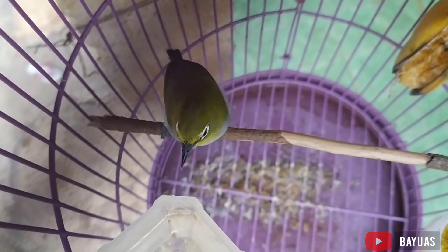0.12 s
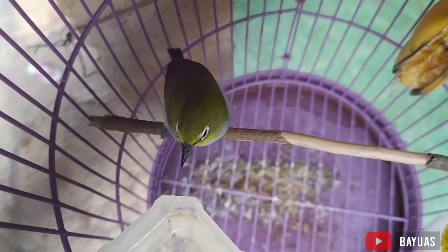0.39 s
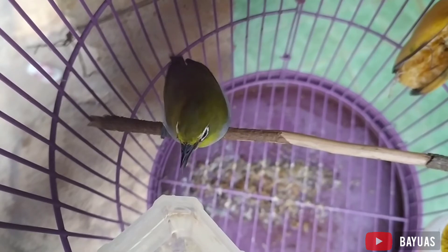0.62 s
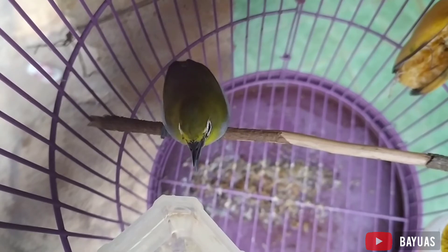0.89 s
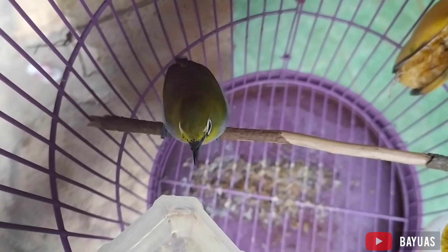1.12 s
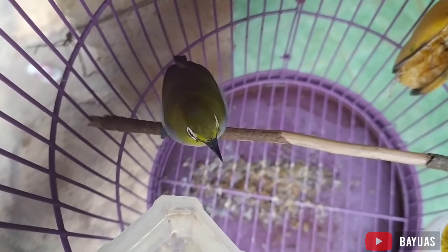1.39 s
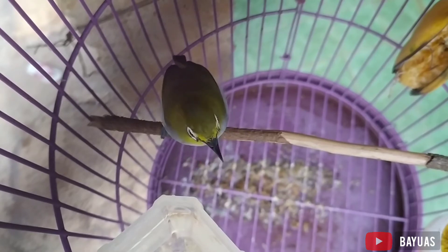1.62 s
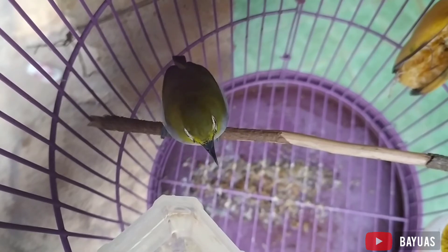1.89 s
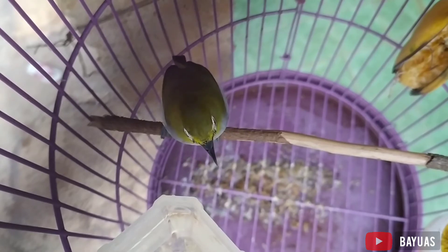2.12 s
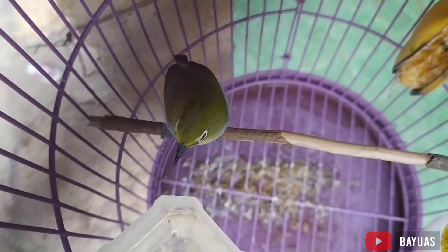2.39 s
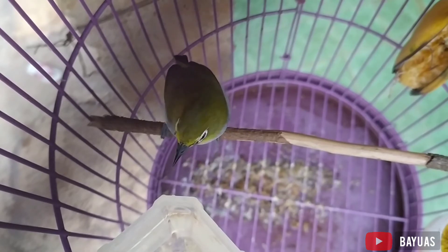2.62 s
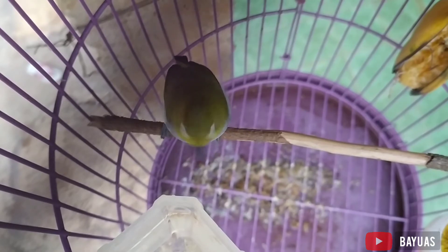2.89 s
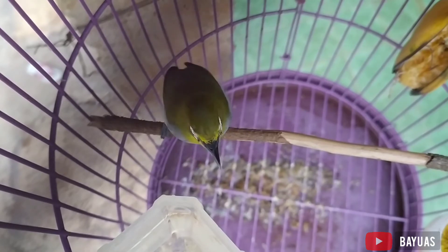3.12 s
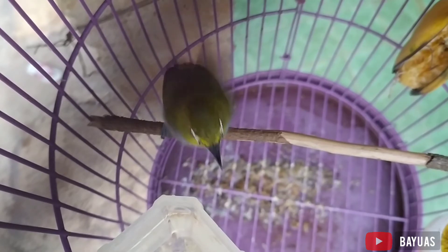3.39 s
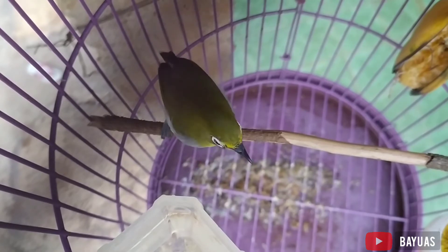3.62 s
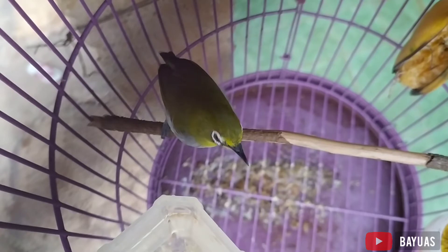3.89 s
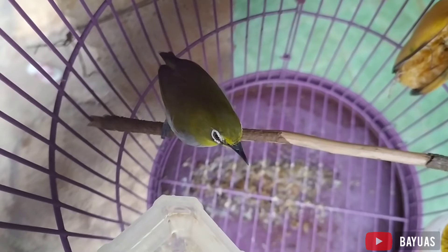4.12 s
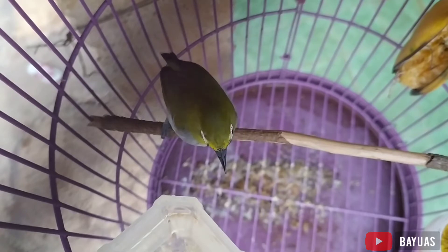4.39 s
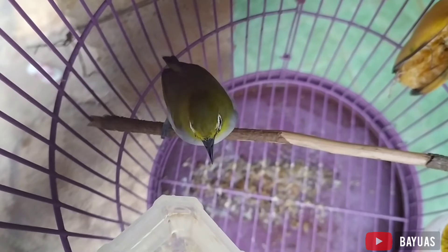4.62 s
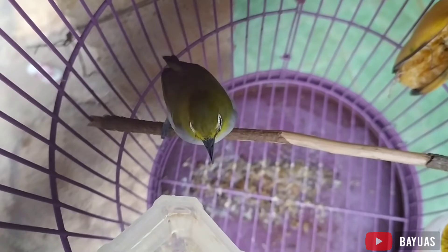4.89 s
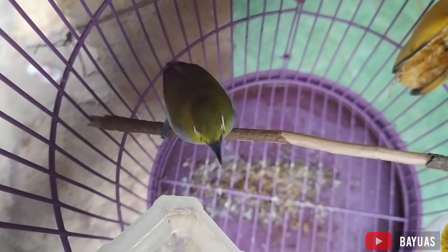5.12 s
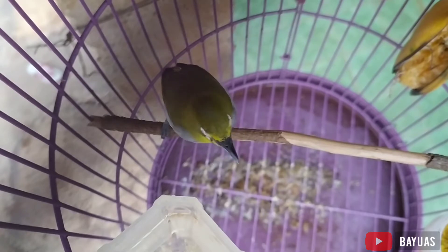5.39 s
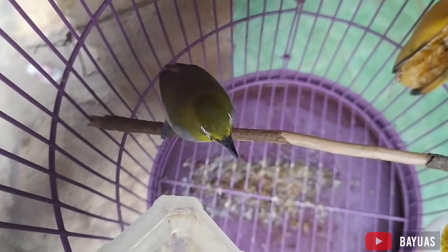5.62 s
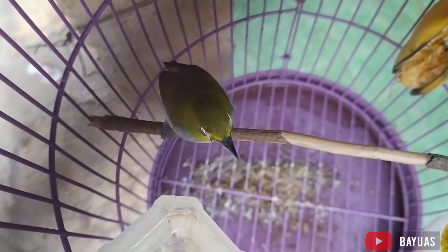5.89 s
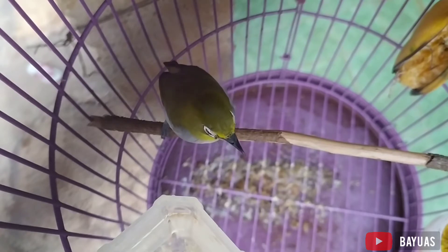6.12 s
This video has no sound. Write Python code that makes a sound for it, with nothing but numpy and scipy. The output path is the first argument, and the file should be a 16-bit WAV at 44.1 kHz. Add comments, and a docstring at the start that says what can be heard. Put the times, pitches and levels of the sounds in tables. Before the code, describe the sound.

A small caged bird gives three loud, buzzy high trills close by, while far birds whistle thinly and a small engine putters past in the street.

```python
"""Yard hiss, a single-cylinder engine and far bird whistles run throughout; over them a small caged bird
gives three trills of quick upward chirps close to a pair of microphones.
Chirps are gliding partials coloured by near reflections; whistles are curved sine glides; the engine
is a stack of firing harmonics that speeds up in the street, with clatter; the hiss is shaped noise.
A soft knock and a faint far horn are sine tones; sparse random echoes make the yard."""
import sys
import numpy as np
from scipy import signal
from scipy.io import wavfile
from scipy.ndimage import uniform_filter1d

SR = 44100
rng = np.random.default_rng(int(sys.argv[2]) if len(sys.argv) > 2 else 0)


def linear_from_db(decibels):
    """Turn decibels (scalar or array-like) into linear amplitude factors; 0 gives 1."""
    return 10 ** (np.asarray(decibels, float) / 20)


def master_out(mix):
    """Clip the mix to full scale and print it as 16-bit PCM to the path in sys.argv[1]."""
    frames = np.transpose(np.atleast_2d(mix))
    ceiling = np.clip(frames, -1, 1)
    pcm = np.round(ceiling * 32767).astype(np.int16)
    wavfile.write(sys.argv[1], SR, pcm)


N = 276234  # length in samples


def evened(x):
    """Scales to rms 1."""
    return x / np.sqrt(np.mean(x ** 2) + 1e-20)


def read(points, hz):
    """Reads a table on a log-frequency axis."""
    f, value = np.transpose(points)
    return np.interp(np.log(hz + 1), np.log(f + 1), value)


def add(mix, s, sound):
    """Mixes a sound in at s seconds."""
    part = mix[..., round(s * SR):][..., :sound.shape[-1]]
    part += sound[..., :part.shape[-1]]


def wobble(count, smooth_s):
    """Random wander of rms 1: white noise smoothed twice over smooth_s."""
    size = max(int(smooth_s * SR), 1)
    once = uniform_filter1d(rng.standard_normal(count), size)
    return evened(uniform_filter1d(once, size))


def band(x, low_hz, high_hz):
    """Band-pass, rms 1."""
    sos = signal.butter(7, [low_hz, high_hz], "band", fs=SR, output="sos")
    return evened(signal.sosfilt(sos, x))


def hiss():
    """Faint hiss of the yard: random short-time spectra with faint drifting patches."""
    # colour of the hiss: f/Hz, relative level/dB per Hz
    colour = [(20, -9), (36, -14), (55, -9), (130, -12), (260, -17), (485, -21.5), (1570, -26.5),
              (3000, -30.5), (3700, -34), (5600, -34.5), (6720, -30.5), (9400, -25.5), (11500, -39.5),
              (14300, -47.5), (16000, -61)]
    # likeness of the two microphones: f/Hz, left-right correlation (-1 to 1)
    likeness = [(30, 0.91), (100, 1), (300, 0.95), (640, -0.093), (1400, -0.56), (3000, 0.31),
                (15000, -0.56)]
    frames, hz = N // 256 + 5, np.fft.rfftfreq(1024, 1 / SR)
    a, b, c, d, patches = rng.standard_normal((frames, 513, 5)).T
    patches = evened(uniform_filter1d(uniform_filter1d(patches, 12, 0), 14, 1))
    same = np.clip(read(likeness, hz), -1, 1)[:, None]
    left = a + 1j * b
    right = same * left + np.sqrt(1 - same ** 2) * (c + 1j * d)
    z = np.array([left, right]) * linear_from_db(read(colour, hz)[:, None] + 1.3 * patches)
    noise = signal.istft(z, nperseg=1024, noverlap=768)[1][:, :N]
    return linear_from_db(-53.5) * evened(noise)


def toot(start_s, end_s, hz, harmonics_db):
    """A faint far horn: a steady stack of harmonics."""
    t = np.arange(0, end_s - start_s, 1 / SR)
    stack = sum(linear_from_db(db) * np.sin(2 * np.pi * (k + 1) * hz * t) for k, db in enumerate(harmonics_db))
    return start_s, stack * signal.windows.tukey(len(t), .2)


def engine():
    """Harmonics of the firing rate, shaped by the exhaust, each wavering as walls throw it back; clatter on top."""
    # loudness of the engine: t/s, level/dB
    loudness = [(0, -49), (.5, -46.5), (1.1, -51.5), (1.75, -50.5), (2.25, -43.5), (3.103, -38.5),
                (3.901, -40.5), (4.4, -39), (4.899, -44), (5.4, -42), (6.26, -49)]
    # firing rate: t/s, firings a second/Hz
    revs = [(0, 12.9), (1.13, 13.1), (1.51, 13.4), (1.85, 14.8), (2.11, 15.7), (2.42, 17.7), (2.79, 19.8),
            (3.4, 22.3), (3.6, 23.2), (4.05, 24), (4.8, 23.95), (5.6, 23.4), (6.26, 22.8)]
    # colour of the exhaust: f/Hz, relative level as it nears/dB, relative level as it leaves/dB
    exhaust = [(25, -24, -20), (45, -19, -14), (64, -9, -17), (95, -5, -5), (120, -6, -3), (143, 0, 0),
               (168, -9, -4), (195, -3, -19), (220, -15, -11), (255, -10, -13), (290, -15, -15),
               (320, -15, -20), (365, -15, -21), (430, -26, -31), (800, -45, -48)]
    pass_s, pass_width_s = 3.15, 0.15  # the clatter swells as the engine goes by
    step = 16  # the harmonics are made at SR / 16
    t = np.arange(0, N, step) / SR
    hz = np.interp(t, *np.transpose(revs))
    phase = 2 * np.pi * np.cumsum(hz) * step / SR
    f, nears_db, leaves_db = np.transpose(exhaust)
    gone = np.clip((t - pass_s) / 0.099, 0, 1)  # the colour changes as the pipe turns away
    low, power = 0, 0
    for k in range(2, 34):
        colour_db = (1 - gone) * np.interp(k * hz, f, nears_db) + gone * np.interp(k * hz, f, leaves_db)
        strength = linear_from_db(colour_db + 2.4 * wobble(len(t), .02))
        waver_rad = (.3 + .035 * k) * wobble(len(t), .015)
        low = low + strength * np.cos(k * phase - .14 * k * k + waver_rad)
        power = power + linear_from_db(2 * colour_db)
    low *= linear_from_db(np.interp(t, *np.transpose(loudness))) / np.sqrt(power)
    low = signal.resample_poly(low, up=step, down=1)[:N]
    swell = 1 / np.hypot(1, (np.arange(N) / SR - pass_s) / pass_width_s)
    clatter = band(rng.standard_normal((2, N)), 1300, 3200) * linear_from_db(-57) * swell
    # the street lies to the right: the left microphone gets it later and weaker
    return np.array([linear_from_db(-1.17) * np.roll(low, 17), low]) + clatter


def whistle(row, attack_s, release, flutter_db, lag, multiple=2, overtone_db=-np.inf, overtone_fade_db=0):
    """A near sine on a curved glide, with an overtone in some birds; it reaches the left ear lag samples late."""
    start_s, length_s, start_hz, bend_hz, end_hz, bend_at, db, fade_db = row
    t = np.arange(0, length_s, 1 / SR)
    u = t / length_s
    w = u ** (np.log(.5) / np.log(np.clip(bend_at, .1, .9)))  # the bend lies at w = 1/2
    hz = start_hz * (1 - w) * (1 - 2 * w) + bend_hz * 4 * w * (1 - w) + end_hz * w * (2 * w - 1)
    trembling_hz = hz + 17 * wobble(len(t), 0.0099)
    phase = 2 * np.pi * np.cumsum(trembling_hz) / SR
    main = linear_from_db(fade_db * u) * np.sin(phase)
    overtone = linear_from_db(overtone_db + overtone_fade_db * u) * np.sin(multiple * phase)
    shape = np.minimum(t / attack_s, 1) * np.minimum((1 - u) / release, 1)  # release: share of the length
    flutter = flutter_db * wobble(len(t), 0.0042)
    # whistles fade in and out on the moving air, the shortest glides less
    waver = 2.3 * np.minimum(length_s / 0.067, 1) * wobble(len(t), .025)
    tone = np.sqrt(2) * (main + overtone) * shape * linear_from_db(db + flutter + waver)
    return start_s, np.array([np.pad(tone, (lag, 0)), np.pad(tone, (0, lag))])


def yard(x):
    """Sparse echoes of random sign, each band dying at its own speed."""
    # decay of the yard: f/Hz, time to fall 60 dB/s
    decay = [(2000, 0.28), (5000, 0.3), (7500, 0.24), (12000, 0.03)]
    taps = np.zeros((2, SR // 2))
    # one echo at a random place in each 20 samples
    at = np.arange(160, SR // 2 - 20, 20) + rng.integers(0, 20, (2, (SR // 2 - 161) // 20))
    np.put_along_axis(taps, at, rng.choice([-1., 1.], at.shape), 1)
    hz, t, z = signal.stft(taps, SR, nperseg=128)
    z *= linear_from_db(-60 * t / read(decay, hz)[:, None])
    tail = signal.istft(z, SR, nperseg=128)[1]
    return signal.fftconvolve(x, tail / np.linalg.norm(tail[0]), axes=1)[:, :N]


def thud(s, db, hz, t60):
    """A soft hollow knock: a dull decaying body tone and a little scuff of noise."""
    t = np.arange(4000) / SR
    ring = np.sin(2 * np.pi * hz * t) + linear_from_db(-15.5) * np.sin(2 * np.pi * 1.8 * hz * t)
    shape = linear_from_db(-60 * t / t60) * np.minimum(t / 0.011, 1) ** 2
    scuff = linear_from_db(-37) * band(rng.standard_normal(len(t)), 330, 3400) * np.exp(-((t - .018) / 0.027) ** 2)
    return s - .004, linear_from_db(db) * (shape * ring + scuff)


def chirp(top_s, top_hz, db, rise_s, fall_s):
    """One arch of pitch, a long rise and a short fall, heard through the reflections of the cage."""
    # near reflections colour each ear, with a notch in mid glide:
    # f/Hz, left level/dB, right level/dB, left lead/rad
    cage = [(2950, -14, -4.5, 6), (3608, -5.5, -15, 1.5), (3420, 3, 2, 4), (4090, 5, -7, 2.5),
            (4600, -20, -22, 3), (5300, -20, -22, -1.5), (5650, -2, 0, -5), (5834, 3, 6, -7.5),
            (6000, -8, -10.5, -3.5), (6500, -8, -7, -.2), (6700, -6.5, -2.3, 0), (6900, -6.4, -4.7, .1),
            (7050, -3.6, -3, -.4), (7180, -4, -1.5, -.4), (7290, -6.5, -4.9, -.6), (7370, -13, -12, -1.3),
            (7430, -20, -11, 1.6), (7510, -7.7, -2, .4), (7600, -1.4, 1, 0), (7720, 2.8, -1, -.4),
            (7850, 1.7, 1.7, -1.55), (7950, -.2, 4, -1.6), (8050, 1.7, 3.7, -1.4), (8200, -2, -1.5, -1.5),
            (8400, -8, -3, 0), (8860, 0.5, 12, 5.5), (10300, -10.5, -1.5, -6), (11670, -16.5, 2.5, -0.5),
            (12000, -21.5, -20.5, 2), (15000, 1.5, -5, 9.5)]
    # the bird shifts on its perch: t/s, shift of the colour/Hz, added left lead/rad
    perch = [(.9, 35, -.5), (3.2, 0, 0), (5.4, -35, .25)]
    # partials of the chirp: frequency as a multiple of the main tone
    multiples = [.5, .75, 1, 1.25, 1.5, 2]
    # strength of these partials: relative level/dB
    partials_db = [-23.5, -22.5, -1, -31.5, -32, -45.5]
    # bands of the noise around the chirp: low f/Hz, high f/Hz
    noise_bands = [(1300, 2100), (3500, 4200), (4750, 5250), (5500, 8600), (9060, 9800), (10120, 12300),
                   (13000, 15700)]
    # strength of these bands: relative level/dB
    noise_db = [-59, -41, -50, -34.5, -39, -42.5, -49]
    start_hz, end_hz = 6250, 6860
    t = np.arange(-rise_s - .017, .028, 1 / SR)
    up = start_hz + (top_hz - start_hz) * np.sin(np.clip(1 + t / rise_s, -.1, 1) * .9) / np.sin(.9)
    # the pitch lingers at the top, then drops
    down = top_hz + (end_hz - top_hz) * np.clip(t / fall_s, 0, 1.3) ** 2
    hz = np.where(t < 0, up, down) * (1 + .002 * wobble(len(t), 0.00073))
    phase = 2 * np.pi * np.cumsum(hz) / SR

    s, shifts_hz, turns_rad = np.transpose(perch)
    shift_hz, turn_rad = np.interp(top_s, s, shifts_hz), np.interp(top_s, s, turns_rad)
    f, left_db, right_db, lead_rad = np.transpose(cage)
    ears = np.zeros((2, len(t)))
    for k, partial_db in zip(multiples, partials_db):
        # each partial swells and dips as it glides across the colour; the weak ones flutter most
        at = k * hz - shift_hz
        half = (np.interp(at, f, lead_rad) + turn_rad) / 2
        flutter_db = (.8 if k == 1 else 3.5) * wobble(len(t), .0009)
        # the weak partials change strength from chirp to chirp
        uneven_db = (k != 1) * 3.0 * rng.standard_normal()
        colour_db = np.array([np.interp(at, f, left_db), np.interp(at, f, right_db)])
        level_db = partial_db + flutter_db + uneven_db + colour_db
        ears += linear_from_db(level_db) * np.sin(k * phase + [half, -half])
    knots_s = [-.007 - rise_s, -.001 - rise_s, .002 - rise_s, 0, .55 * fall_s, fall_s, fall_s + .003]
    shape_db = np.interp(t, knots_s, [-61.5, -9.0, -2.5, -3.0, -7.0, -10.5, -64.5])
    ears *= uniform_filter1d(linear_from_db(shape_db), size=90)

    # banded noise around each chirp, wavering in level
    white = rng.standard_normal((2, len(t)))
    noise = 0
    for (low_hz, high_hz), band_db in zip(noise_bands, noise_db):
        noise = noise + linear_from_db(band_db + 4.1 * wobble(len(t), 0.0086)) * band(white, low_hz, high_hz)
    ears += noise * signal.windows.tukey(len(t), .75)
    return top_s + t[0], ears * linear_from_db(db)


def scene():
    """Near bird nearly dry, far birds wetter, over engine and hiss."""
    # faint far horn: start t/s, end t/s, f/Hz, level of each harmonic before the far gain/dB
    toots = [(0.411, 0.782, 277.7, [-85, -77, -78, -82])]
    # far birds, one row a glide; touching rows make one longer whistle: start t/s, length/s,
    # start f/Hz, f at the bend/Hz, end f/Hz, share of the length at the bend,
    # level before the far gain/dB, level change by the end/dB
    low_bird = [(0.087, 0.77, 2050, 2207, 1736, 0.35, -70.5, 8),
                (4.355, 0.3, 1955, 2275, 2356, 0.32, -63, 1.5),
                (4.743, .42, 2125, 2100, 1992, 0.65, -59, -7),
                (5.233, 0.55, 1975, 1885, 1842, 0.47, -54, -19)]
    two_tone_bird = [(1.345, 0.42, 1665, 2136, 2410, .27, -66, -14),
                     (1.69, .28, 2360, 2190, 2090, 0.33, -72, 8)]
    high_bird = [(0, .12, 4970, 4800, 4770, 0.27, -67, -18),
                 (0.146, 0.55, 4824, 4713, 4894, 0.26, -54, -21.5),
                 (.69, .32, 4760, 4680, 4850, .33, -50, -14),
                 (1.395, 0.39, 3960, 4070, 4210, 0.36, -60.5, -21)]
    slurring_bird = [(5.712, 0.11, 2950, 2950, 2895, 0.35, -59.5, -12),
                     (5.762, 0.044, 2860, 2690, 2580, 0.42, -62, -3),
                     (5.903, 0.028, 3330, 4440, 5400, 0.38, -64, 1),
                     (5.972, 0.014, 3850, 3650, 3400, .4, -53, -4),
                     (6.043, .021, 2380, 3000, 3850, .5, -64, 17),
                     (6.064, 0.083, 3850, 3280, 3200, .3, -47, -8),
                     (6.153, 0.05, 3290, 2884, 2740, .4, -56, -4)]
    # soft knock: t/s (it starts 4 ms ahead), level/dB, f/Hz, time to fall 60 dB/s
    thuds = [(0.292, -19.5, 263.4, 0.063)]
    # near bird, one row a chirp: t of the pitch top/s, top f/Hz, level/dB, rise/s, fall/s
    chirps = [(0.7212, 7846, -4.5, .0205, 0.0076), (0.7658, 8040, -3, .0168, .0072),
              (0.8124, 8190, -3.5, 0.019, 0.005), (0.8573, 8110, -3.5, 0.015, 0.0072),
              (0.9041, 8067, -3, .0168, 0.0049), (0.9509, 8120, -3.5, .0168, 0.0092),
              (1.003, 7900, -3, 0.015, .0072), (1.061, 7667, -3, 0.017, 0.0043),
              (1.1274, 7540, -5.5, 0.017, 0.0045), (3.042, 7960, -3.5, .0175, .0075),
              (3.089, 8080, -2.5, 0.023, 0.0059), (3.134, 8120, -2, .0172, 0.0066),
              (3.1807, 8260, -4, 0.02, 0.0089), (3.226, 8220, -4, .0162, .0076),
              (3.277, 8134, -3.5, 0.018, 0.0067), (3.3248, 7980, -3, .0168, 0.0084),
              (3.3761, 8200, -4, .0168, 0.0078), (3.4391, 7750, -4, .0152, .0082),
              (5.198, 7810, -2.5, .0205, 0.0048), (5.2428, 8060, -2, .0168, 0.0077),
              (5.292, 8160, -4.5, 0.02, 0.0083), (5.341, 8200, -4, 0.02, 0.0057),
              (5.3883, 8210, -4, .0168, 0.0079), (5.4354, 8250, -4.5, 0.019, 0.0057),
              (5.484, 8210, -4.5, 0.019, .0072), (5.5338, 8265, -4, 0.017, 0.0079),
              (5.583, 7930, -2.5, 0.013, .0072), (5.64, 7930, -3.5, 0.017, .0072),
              (5.7025, 7610, -2.5, .0158, .0062)]
    near, far = np.zeros((2, 2, N))
    for row in toots:
        add(far, *toot(*row))
    for row in low_bird:
        add(far, *whistle(row, attack_s=0.045, release=0.08, flutter_db=2.6, lag=6))
    for row in two_tone_bird:
        add(far, *whistle(row, attack_s=0.021, release=0.08, flutter_db=3.5, lag=6,
                          multiple=3 / 2, overtone_db=-7, overtone_fade_db=3))  # a fifth above
    for row in high_bird:
        add(far, *whistle(row, attack_s=0.0043, release=0.25, flutter_db=4.0, lag=7,
                          overtone_db=-0.5, overtone_fade_db=-43.5))
    for row in slurring_bird:
        add(far, *whistle(row, attack_s=0.0016, release=0.085, flutter_db=4.5, lag=5))
    for row in thuds:
        add(near, *thud(*row))
    for row in chirps:
        add(near, *chirp(*row))
    close = near + linear_from_db(-25.5) * yard(near)
    distant = linear_from_db(7.5) * far + linear_from_db(0.6) * yard(far)
    return close + distant + engine() + hiss()


def top_cut(x):
    """Nothing passes above the cut-off."""
    return signal.sosfilt(signal.butter(12, 16520, fs=SR, output="sos"), x)


def record(dry):
    """The capsule bends a little on loud chirps, which adds an octave and a low thump."""
    bent = dry + .016 * dry ** 2
    bent = signal.sosfilt(signal.butter(2, 14, "high", fs=SR, output="sos"), bent)
    bent = signal.sosfilt(signal.butter(10, 15700, fs=SR, output="sos"), bent)
    return top_cut(bent)


dry = scene()
out = record(dry)
master_out(out)
```